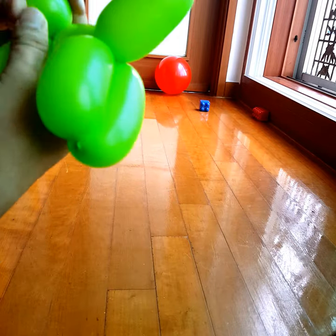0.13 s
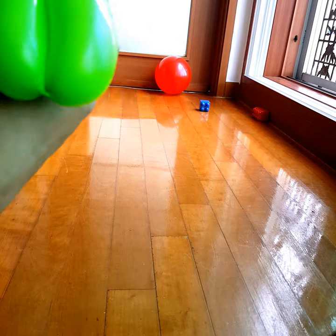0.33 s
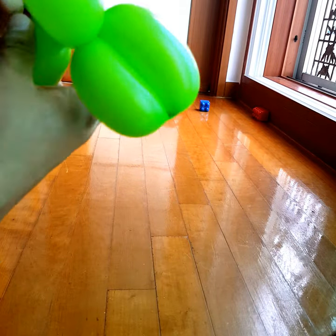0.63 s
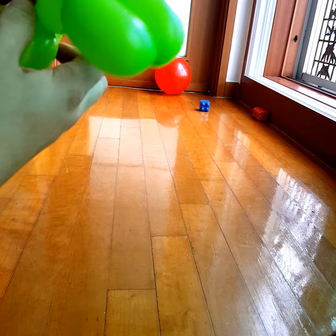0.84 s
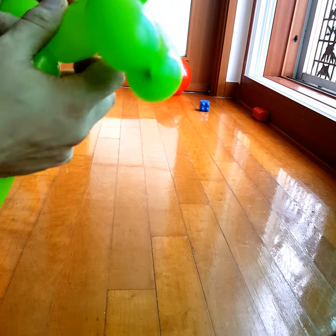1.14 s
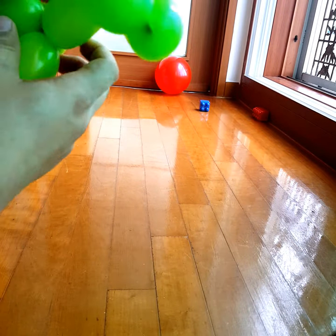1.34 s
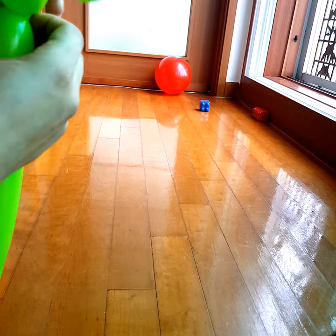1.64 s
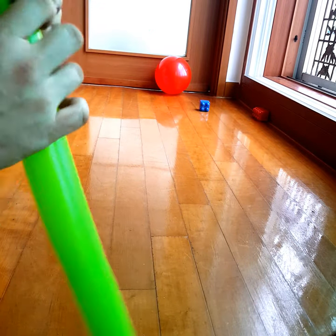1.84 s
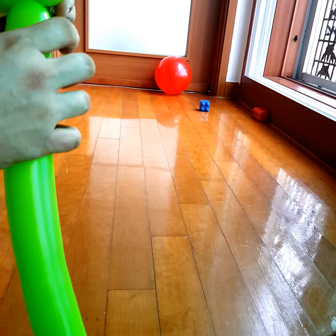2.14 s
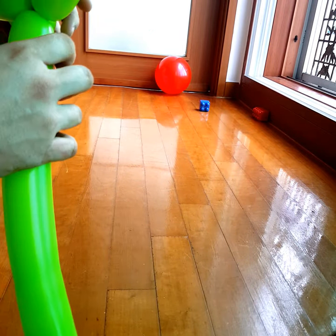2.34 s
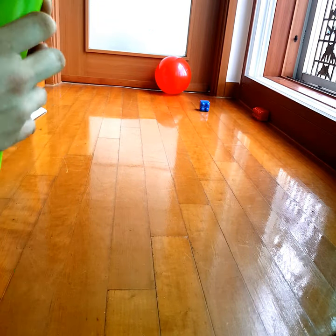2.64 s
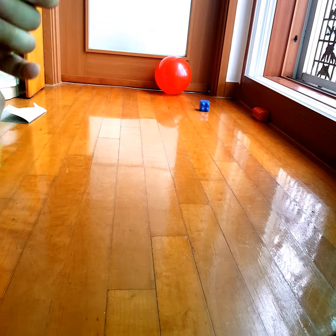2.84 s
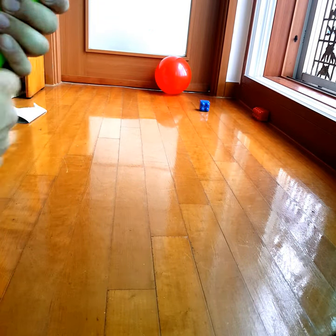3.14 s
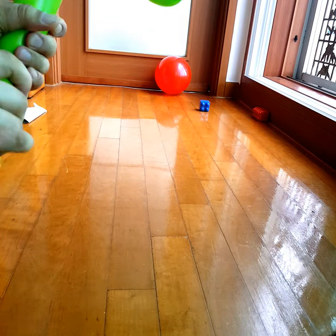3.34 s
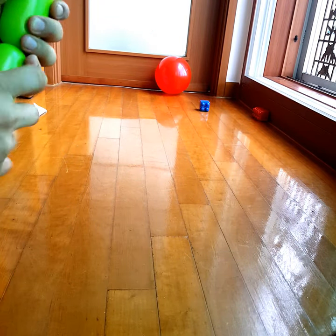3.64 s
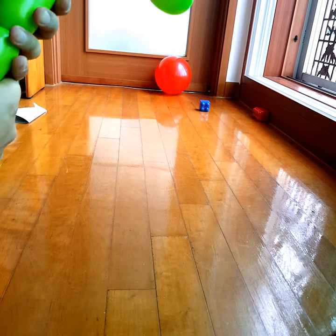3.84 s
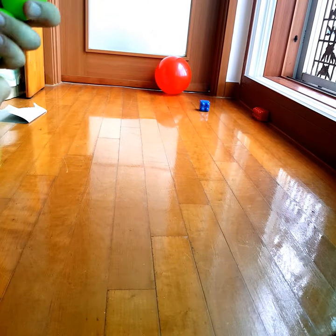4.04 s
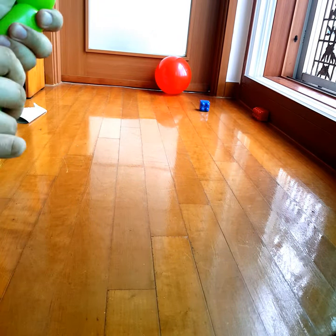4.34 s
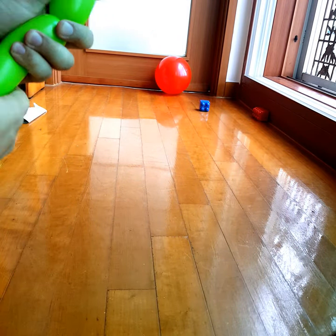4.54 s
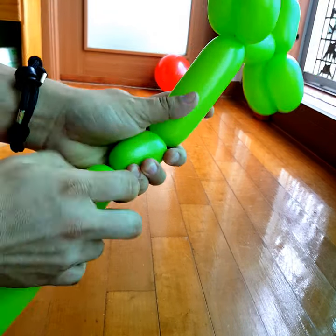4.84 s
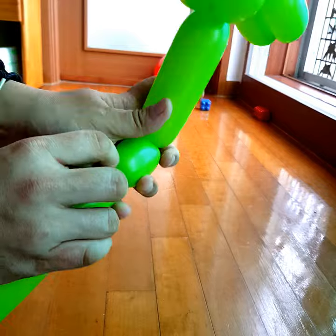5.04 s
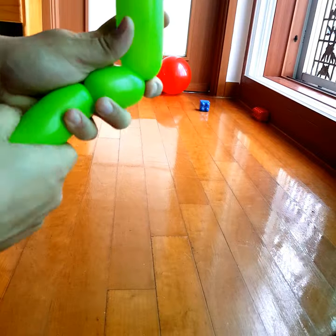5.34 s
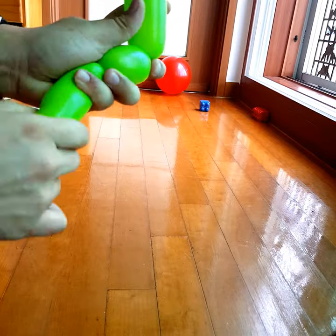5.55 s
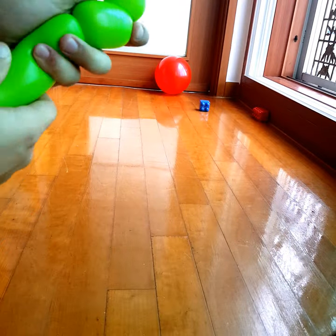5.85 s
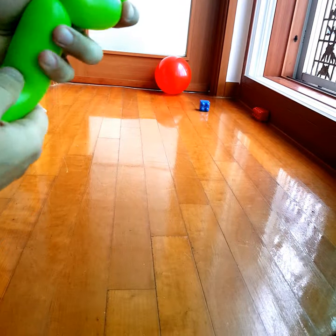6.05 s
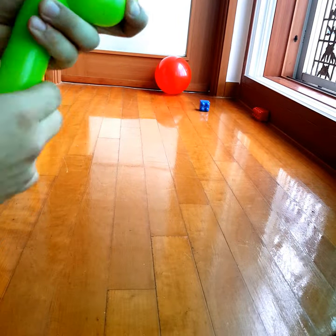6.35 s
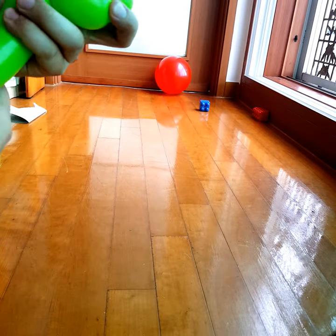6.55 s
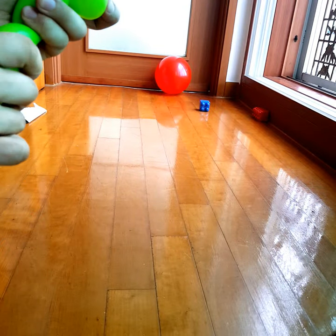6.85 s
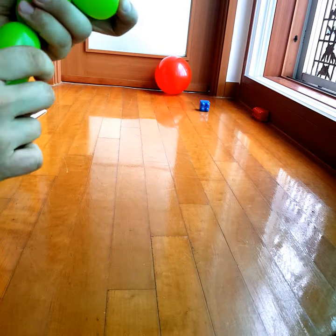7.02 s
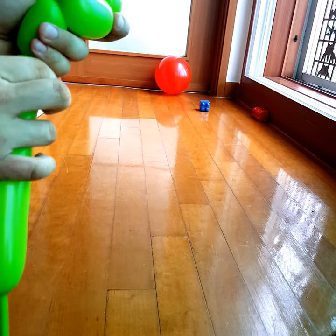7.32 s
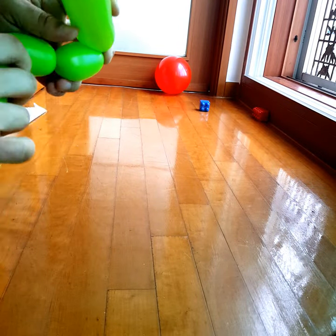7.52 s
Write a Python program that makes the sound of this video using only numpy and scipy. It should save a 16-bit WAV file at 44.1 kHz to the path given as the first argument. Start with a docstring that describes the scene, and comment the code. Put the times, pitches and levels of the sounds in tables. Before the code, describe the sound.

Close, bright rubbing of tight balloon skin: ragged creaks, very brief gliding squeaks from low honks to thin chirps, and crisp snaps as the latex slips free. Fine fingertip crackle runs beneath and fades when the hands rest. Activity comes in uneven bursts with short gaps, busiest in the second half. Small lively indoor room, quiet steady room noise, stereo microphone nearby.

```python
"""A long latex balloon creaks, squeaks and snaps as two hands twist it, close to two microphones.
Its skin sticks and slips: ragged rows of tiny slips creak, even rows squeak and glide, and short
noisy bursts snap as the skin lets go. One set of resonances, for the taut skin and the air inside,
colors the creaks, rasps, snaps and fingertip crackle; the squeaks' clean tones bypass it. A few low
bumps, the short ring of a small room with a wooden floor, and steady room noise complete the scene."""
import sys
import numpy as np
from scipy import signal
from scipy.fft import rfft, irfft, next_fast_len
from scipy.io import wavfile

SR = 44100
rng = np.random.default_rng(int(sys.argv[2]) if len(sys.argv) > 2 else 0)


def store_pcm(level_fs):
    """Save levels as 16-bit WAV."""
    pcm = np.round(np.clip(level_fs, -1, 1) * 32767).astype(np.int16)
    wavfile.write(sys.argv[1], SR, np.atleast_2d(pcm).T)


N = 338688  # length of the scene in samples

# Creaks, skin dragging under the fingers: (t/s, length/s, level of the middle band level/dB,
# bass against that level/dB, ring of the rubbed patch f/Hz)
CREAK_STROKES = [(0, 0.014, -31, -20, 3040), (0.086, 0.023, -29.5, -3.5, 4100),
                 (0.187, 0.023, -32, -14, 1650), (0.286, 0.04, -31.5, -31, 4700),
                 (0.37, 0.055, -33.5, -32, 3490), (0.578, 0.023, -34.5, -9.5, 2520),
                 (0.891, 0.051, -38.5, -6.5, 3200), (0.965, 0.046, -35, -17, 4620),
                 (1.083, 0.061, -26, -25, 3600), (1.754, 0.052, -23.5, -19, 3200),
                 (1.997, 0.042, -29, -18, 3100), (2.026, 0.04, -23.5, -12, 3270),
                 (2.15, 0.025, -40, 1.5, 1550), (2.623, 0.092, -44, -3, 1710),
                 (2.737, 0.034, -33.5, -6.5, 5140), (2.795, 0.059, -30.5, -14.5, 6700),
                 (2.874, 0.051, -30.5, -11, 6650), (2.913, 0.022, -23, -24, 4200),
                 (2.948, 0.027, -22.5, -27, 2730), (2.972, 0.023, -33, -25, 2900),
                 (3.051, 0.08, -29.5, -24, 3900), (3.123, 0.028, -20.5, -15.5, 2600),
                 (3.155, 0.063, -27.5, -19, 2830), (3.249, 0.016, -30.5, -13.5, 4370),
                 (3.335, 0.093, -28, -29, 4300), (3.483, 0.024, -31, -7.5, 2120),
                 (3.577, 0.038, -27.5, -11, 3300), (3.973, 0.041, -34, -14, 6600),
                 (4.024, 0.028, -33.5, -12, 7000), (4.064, 0.077, -26.5, -17, 4700),
                 (4.169, 0.031, -17, -10.5, 7300), (4.286, 0.025, -29.5, -35, 3670),
                 (4.322, 0.039, -30.5, -22, 5600), (4.492, 0.029, -27, -25, 4070),
                 (4.54, 0.054, -30, -14, 1680), (4.6, 0.071, -44, 2.5, 1640),
                 (4.868, 0.052, -28, -11.5, 3700), (4.978, 0.057, -32.5, -6.5, 1590),
                 (5.079, 0.029, -20.5, -15, 3430), (5.315, 0.024, -20.5, -12, 3660),
                 (5.41, 0.022, -30, -14, 2300), (5.475, 0.025, -33.5, -14, 2770),
                 (5.655, 0.021, -30, -21, 3530), (5.733, 0.043, -27.5, -9.5, 1420),
                 (6.043, 0.029, -17.5, -15, 7000), (6.168, 0.032, -30, -16, 1770),
                 (6.209, 0.058, -27, -15.5, 3270), (6.328, 0.092, -28.5, -15.5, 2630),
                 (6.453, 0.053, -21, -15.5, 3840), (6.555, 0.034, -35, -16, 3570),
                 (6.612, 0.037, -21.5, -27, 3320), (6.68, 0.02, -25.5, -12, 1590),
                 (6.828, 0.023, -34, -15, 3880), (6.857, 0.083, -35.5, -12, 3930),
                 (6.922, 0.087, -24.5, -18, 2880), (7.042, 0.028, -32, -10, 3070),
                 (7.164, 0.049, -25, -12.5, 3170), (7.266, 0.048, -40.5, -6.5, 1420),
                 (7.338, 0.071, -28.5, -17, 1350), (7.513, 0.0225, -23, -16.5, 6850),
                 (7.532, 0.026, -19.5, -15, 3420)]
CREAK_JITTER, FIRM_DB, JITTER_PER_DB = 0.3, -22, 0.03  # lighter creaks stumble more
CREST, CREST_PER_S = 0.26, 0.8  # share of a creak spent swelling: long ones build up more slowly
CREAK_SAG_OCTAVES = 0.25  # the rubbed patch slackens, so its ring sinks through a creak


def creak(row, chance):
    """A ragged rub: its attack follows its length, its unevenness follows its force, its ring sinks."""
    s, length, level_db, bass_db, ring_hz = row
    jitter = np.clip(CREAK_JITTER + JITTER_PER_DB * (FIRM_DB - level_db), 0.24, 0.7)
    sag = CREAK_SAG_OCTAVES * np.linspace(1 / 2, -1 / 2, int(length * SR))
    patch_hz = ring_hz * 2 ** sag
    crest = CREST + CREST_PER_S * length
    stroke = (length, crest, patch_hz, jitter, level_db, bass_db, treble_at(s))
    return rub(stroke, chance, skin_ring(chance[0, -1]))


# Squeaks, where the slipping locks to a pitch: (t/s, length/s, pitch in mid-glide f/Hz, glide/octaves,
# rasp, middle band level/dB, clean tone before its overtones and TONE_TRIM_DB level/dB)
SQUEAK_STROKES = [(0.025, 0.027, 1543, -0.24, -27, -36), (0.056, 0.026, 961, -0.33, -21, -64),
                  (0.214, 0.03, 700, -0.072, -31, -35), (0.428, 0.05, 608, -0.31, -62, -43),
                  (1.271, 0.0079, 657, -0.26, -49, -40), (1.597, 0.028, 2230, 0, -69, -50),
                  (1.876, 0.014, 1315, -0.32, -29.5, -29.5), (1.894, 0.044, 735, -0.21, -29, -30.5),
                  (3.314, 0.03, 1566, 0.024, -25.5, -64), (3.321, 0.012, 4690, -0.16, -23.5, -27),
                  (3.425, 0.025, 1632, 0.12, -30.5, -25.5), (3.55, 0.031, 1192, 0.11, -35, -34.5),
                  (3.665, 0.035, 2456, -0.012, -27.5, -49), (3.69, 0.043, 1619, 0.014, -20, -41),
                  (3.807, 0.049, 3690, 0.046, -31.5, -42), (3.864, 0.024, 3870, -0.14, -26.5, -46),
                  (4.096, 0.017, 4690, 0.3, -41, -16), (4.146, 0.037, 2410, -0.16, -17.5, -45),
                  (4.571, 0.062, 1640, -0.15, -54, -39), (4.633, 0.048, 634, -0.2, -51, -43),
                  (4.721, 0.039, 2610, 0.14, -23, -28), (4.785, 0.016, 5100, 0.028, -25, -31),
                  (4.924, 0.034, 2164, -0.22, -23, -28), (5.041, 0.033, 1445, -0.19, -22.5, -45),
                  (5.133, 0.024, 1555, -0.14, -15, -29), (5.151, 0.028, 3910, 0.108, -18, -6.5),
                  (5.166, 0.029, 797, -0.19, -19, -27.5), (5.188, 0.0327, 684, -0.127, -27.5, -26.5),
                  (5.237, 0.031, 700, -0.12, -33, -40), (5.284, 0.0155, 2690, 0.059, -21, -32),
                  (5.299, 0.0165, 2292, 0.14, -18.5, -19), (5.321, 0.0087, 1055, 0.45, -21, -23.5),
                  (5.557, 0.053, 2593, -0.23, -23, -48), (5.693, 0.011, 2073, -0.22, -19, -19.5),
                  (5.892, 0.034, 1150, -0.67, -28, -46), (5.922, 0.044, 637.3, -0.028, -27.5, -31.5),
                  (6.228, 0.057, 3290, 0.063, -36, -23.5), (6.369, 0.057, 2550, -0.11, -36, -31),
                  (6.463, 0.048, 645, -0.16, -43, -32.5), (6.516, 0.035, 782, -0.21, -47, -39.5),
                  (6.729, 0.016, 727, -0.28, -27.5, -32.5), (7.368, 0.03, 1095, -0.16, -25.5, -26),
                  (7.394, 0.027, 573, -0.13, -18.5, -40), (7.555, 0.025, 736, -0.34, -22, -34),
                  (7.558, 0.019, 7120, 0.04, -41, -23)]
SQUEAK_JITTER, SQUEAK_CREST = 0.1333, 0.52
LOW_HZ, LOW_BASS_DB, BASS_DB_PER_OCTAVE = 700, -12.5, -5.5  # the higher a squeak, the less bass it has
OVERTONE_DB, OVERTONE_PER_TREBLE = -0.5, 3.4  # second harmonic, which follows the treble


def squeak(row, chance):
    """An even rub (the rasp) and a clean tone glide together; higher squeaks have less bass."""
    s, length, hz, glide, rasp_db, tone_db = row
    bass_db = LOW_BASS_DB + BASS_DB_PER_OCTAVE * np.log2(hz / LOW_HZ)
    treble_db = treble_at(s)
    pitch = hz * 2 ** (glide * np.linspace(-1 / 2, 1 / 2, int(length * SR)))
    stroke = (length, SQUEAK_CREST, pitch, SQUEAK_JITTER, rasp_db, bass_db, treble_db)
    rasp = rub(stroke, chance, skin_ring(chance[0, -1]), wander=0.1)
    second_db = OVERTONE_DB + OVERTONE_PER_TREBLE * treble_db
    tone = squeal((length, pitch[0], pitch[-1], tone_db, second_db), chance)
    return rasp, tone


WAVER_PER_S = 0.77  # pitch waver per second of length: long squeaks hold their pitch less firmly
TONE_CREST, TONE_EASE = 0.55, 0.24  # a tone builds up while the slipping locks


def squeal(stroke, chance, waver_per_s=600, flutter_db=3, overtone_fall_db=8):
    """Regular slipping makes a gliding, fluttering tone with a few overtones."""
    length, first_hz, last_hz, level_db, second_db = stroke
    t = np.arange(int(length * SR)) / SR
    waver = 1 + WAVER_PER_S * length * drift(t, chance[0], waver_per_s)
    hz = np.linspace(first_hz, last_hz, len(t)) * waver
    phase = 2 * np.pi * np.cumsum(hz) / SR
    wave = np.sin(phase)
    for k in range(2, 10):
        if k * hz.max() < SR / 2:  # only overtones that digital sound can hold
            # offset of 2.5: the second harmonic sits half a step above second_db
            wave = wave + gain_of(second_db - overtone_fall_db * (k - 2.5)) * np.sin(k * phase)
    flutter = gain_of(flutter_db * drift(t, chance[1], waver_per_s))
    force = evened(grip(t, TONE_CREST, ease=TONE_EASE) * flutter)
    return gain_of(level_db) * np.sqrt(2) * force * wave


SLIP_SPREAD = 1.45  # how unequal the slips are in size, more so in uneven strokes
SLIP_TAPS = 10  # samples used to place one slip


def rub(stroke, chance, ring, wander=0.15, wander_per_s=90, scatter=1.2, lurch_db=1.5, lurch_per_s=260,
        patch_db=6, patch_width=480, partner_db=-4, slips_per_s=1050):
    """Slips, uneven in spacing and size, strike the skin through the ringing patch under the finger."""
    length, crest, patch_hz, jitter, level_db, bass_db, treble_db = stroke
    t = np.arange(int(length * SR)) / SR
    hz = patch_hz * np.exp(wander * drift(t, chance[0], wander_per_s))  # patch stretches and slackens
    # a smooth stroke slips every cycle, a ragged one at its own pace
    ragged = jitter > 0.23
    turns = slips_per_s * t if ragged else np.cumsum(hz) / SR

    # waits between slips, in cycles, are random around one
    spread = scatter * jitter
    due = np.cumsum(np.exp(spread * chance[1] - spread ** 2 / 2))
    due = due - due[0]
    at = np.interp(due[due < turns[-1]], turns, np.arange(len(t)))
    force = grip(t, crest) * gain_of(lurch_db * drift(t, chance[2], lurch_per_s))
    unequal = np.exp(SLIP_SPREAD * jitter * np.clip(chance[3, :len(at)], -2, 2))
    sizes = force[at.astype(int)] * unequal

    # each slip may fall between two samples, so a short smooth pulse draws it
    near = at.astype(int)[:, None] + np.arange(SLIP_TAPS)
    offset = near - at[:, None] - SLIP_TAPS / 2
    pulses = sizes[:, None] * np.sinc(offset) * np.cos(np.pi * offset / (SLIP_TAPS + 2)) ** 2
    slips = np.bincount(near.ravel(), pulses.ravel(), len(t) + 10 * SLIP_TAPS)

    # the patch rings in two modes, an octave apart, that glide together
    mode_hz = np.pad(hz, (0, len(slips) - len(t)), "edge")
    octave_hz = mode_hz * (1 / 2 if ragged else 2)
    main_mode = resonate(slips, mode_hz, patch_width)
    partner = gain_of(partner_db) * resonate(slips, octave_hz, patch_width)
    slips = slips + gain_of(patch_db) * (main_mode + partner)

    # a broad, soft contact brings out the bass; a tight, dry one the treble
    parts = bands(signal.fftconvolve(slips, ring))
    band_gains = gain_of(level_db + np.array([bass_db, 0, treble_db]))
    return band_gains * np.sqrt(len(t)) / np.linalg.norm(parts, axis=1) @ parts


# Treble of the creaks and rasps, which also steers the squeaks' overtones:
# (t/s, treble against the middle band level/dB)
STROKE_TREBLE = [(0.05, -6), (0.35, -1.5), (1.0, -3), (2.7, -5.5), (3.15, -6.5), (3.75, 0), (4.15, -2),
                 (4.75, -10.5), (5.3, -7), (5.6, -15), (6.0, -3), (6.65, -9), (6.95, -8), (7.18, -6),
                 (7.55, -9)]


def treble_at(s):
    """Reads how bright the rubbing is at time s."""
    return np.interp(s, *np.transpose(STROKE_TREBLE))


def grip(t, crest, rise_s=0.0024, ease=0.085):
    """A stroke swells to its crest, holds and lets go; a later crest starts from less force."""
    crest = np.clip(crest, 0.02, 0.98)
    swell = np.interp(t / t[-1], [0, crest, 1], [1 - crest, 1, 1])
    ramp_s = rise_s + ease * crest * (1 - crest) * t[-1]  # a crest midway gives the longest fades
    return swell * np.clip(np.minimum(t, t[-1] - t) / ramp_s, 0, 1)


def resonate(x, hz, width):
    """A moving resonance: shifts the curve hz down to zero, smooths, and shifts back."""
    turn = np.exp(2j * np.pi * np.cumsum(hz) / SR)
    r = np.exp(-np.pi * width / SR)  # a narrow width (Hz) rings longer
    return 2 * (turn * signal.lfilter([1 - r], [1, -r], x / turn)).real


# Color of the taut skin and the air inside, before stretching: (f/Hz, level/dB)
SKIN_COLOR = [(60, -50.5), (330, -17.5), (520, -6.5), (660, -2.5), (930, -6), (2500, 4.5), (3200, 9.5),
              (3900, 13), (4700, 5.5), (6000, 1), (7100, 4.5), (8200, -4.5), (11000, 0), (13300, -10)]
# Narrow ring of the skin, added on top of that color: (f/Hz, width/Hz, level against the color/dB)
SKIN_RINGS = [(9240, 390, -12.5)]
STRETCH_OCTAVES = 0.09  # the skin's tension, and with it its color, differs from stroke to stroke


def skin_ring(stretch=0, size=2048):
    """How the balloon answers one slip; stretching shifts all its resonances."""
    hz = np.fft.rfftfreq(size, 1 / SR) / 2 ** (STRETCH_OCTAVES * stretch)
    peaks = sum(gain_of(db) / (1 + (2 * (hz - f) / w) ** 2) for f, w, db in SKIN_RINGS)
    gain = gain_of(read(SKIN_COLOR, hz)) * (1 + peaks)
    # minimum phase: the answer starts at once, never before the slip
    log_gain = np.log(np.r_[gain, gain[-2:0:-1]])
    return np.fft.ifft(np.exp(np.conj(signal.hilbert(log_gain)))).real[:size // 2]


# Snaps of the skin letting go: (t/s, peak before snap_db and echoes level/dB,
# bass before bass_lift_db/dB, decay of the chatter/ms)
SNAP_HITS = [(0.351, -5.5, -17, 2.5), (0.3547, -5.5, -13, 3.5), (0.3605, -1, -22, 1.8),
             (0.46, -25, 20, 2.7), (0.4984, -6, -21, 4.2), (0.626, -18, -14.5, 4), (0.66, -17, -13, 4),
             (0.858, -13, -15.5, 5), (1.044, -19.5, -8, 2.7), (1.065, -3.5, -17.5, 3.7),
             (1.092, -8, -28, 1.3), (1.098, -7, -20, 2.4), (1.1135, -2, -28, 3.2), (1.302, -26, 16, 3),
             (1.354, -16, -5, 6.5), (1.4325, -14, -21, 4.9), (1.481, -26, -26, 3), (1.73, -12.5, -20, 3),
             (1.7715, -4.5, -30, 4), (1.778, -5, -20.5, 3.2), (1.842, -12.5, -10, 2),
             (2.026, 0.5, -30, 2.1), (2.092, -9, -26, 2.6), (2.272, -24.5, -11, 4.5),
             (2.32, -17.5, -4.5, 3.7), (2.36, -21, -6.5, 3.7), (2.452, -22.5, -34, 2.7),
             (2.743, -14.5, -21, 4.8), (2.812, -7, -45, 5), (2.88, -17, -29, 2), (2.914, -6, -42, 5.6),
             (2.93, 0, -36, 2.1), (3.053, -7.5, -49, 5.2), (3.1255, -10, -26, 1.5), (3.139, 0, -20, 1.5),
             (4.032, -13, -25, 3.5), (4.289, -21, -42, 3.5), (4.331, -7, -22, 4.3), (4.691, -17, -8.5, 4),
             (4.8985, -2.5, -41, 2.2), (5.139, -2, -25, 3), (5.3025, -4.5, -34, 2.5),
             (5.3215, -2, -17.5, 2.5), (5.3305, -8, -18, 2), (5.339, -3, -17, 1.5),
             (5.3455, -5.5, -28, 1.1), (5.694, -6.5, -11, 3), (5.7285, -2, -18, 1.5),
             (5.7825, -11.5, -15, 1.7), (5.7895, -13, -10.5, 1), (5.945, -4, -24, 1.8),
             (6.048, 2.5, -19.5, 1.7), (6.456, -2.5, -31, 2.9), (6.496, -0.5, -27, 4.7),
             (6.615, -3, -22, 2.7), (6.624, -5.5, -21.5, 2.9), (6.6305, -6, -23, 1.7),
             (6.677, -5.5, -25, 2.5), (6.689, -11, -11, 2.4), (6.7385, -9.5, -19, 2.8),
             (6.826, -12.5, -33, 3), (7.366, -6.5, -16, 3), (7.3955, -4, -8, 1.7), (7.4775, -9, -16, 4.3),
             (7.4985, -11, -16, 4.3)]


def snap(row, chance, bass_lift_db=19, snap_db=-1):
    """A short burst of noisy chatter with a small click in it; the air in the tube adds a low pop."""
    _, peak_db, bass_db, chatter_ms = row
    ms = np.arange(len(chance)) * 1000 / SR
    push = chance * np.exp(-ms / chatter_ms)
    push[20] += 2  # the small click
    parts = bands(signal.fftconvolve(push, skin_ring(chance[-1])))
    sound = gain_of([bass_db + bass_lift_db, 0, 0]) @ parts
    return gain_of(peak_db + snap_db) * sound / abs(sound).max()


# Fingertip crackle, which nearly vanishes when the hands rest: (t/s, level/dB)
FINGER_LEVEL = [(0, -42.5), (0.62, -40), (0.8, -62), (1.05, -38), (1.3, -60), (1.68, -59), (1.85, -33.5),
                (2.25, -52), (2.62, -68), (2.9, -36), (4.2, -48), (4.44, -71), (4.65, -45.5), (5.2, -45.5),
                (5.85, -37), (6.95, -54), (7.12, -65), (7.4, -63)]


def fingers(ring, ticks_per_s=500, spread_db=6, largest=2.94, count=8):
    """Fine random ticks of fingertips shifting on the skin; each finger is heard by its own path."""
    ticks = rng.exponential(1, N)
    sizes = gain_of(spread_db * np.minimum(ticks, largest)) * (rng.random(N) < ticks_per_s / SR)
    finger = rng.integers(0, count, N)
    crackle = np.zeros((2, N))
    for k, path in enumerate(rng.random(size=(count, 36))):
        own_ticks = (sizes * (finger == k))[None]
        crackle += signal.oaconvolve(own_ticks, nearby(ring, path), axes=1)[:, :N]
    level_db = np.interp(np.arange(N) / SR, *np.transpose(FINGER_LEVEL))
    return gain_of(level_db) * evened(crackle)


# Low groans and a soft bump as the hands change grip: (t/s, length/s, pitch f/Hz, level/dB)
GRIP_BUMPS = [(2.616, 0.048, 279, -54), (2.899, 0.25, 229, -54), (3.041, 0.051, 125, -48),
              (7.58, 0.043, 246, -52)]


def bump(row, chance):
    """A dull, slightly wavering low tone that swells and fades, alike on both sides."""
    _, length, hz, level_db = row
    t = np.arange(int(length * SR)) / SR
    waver = 1 + 0.13 * drift(t, chance, 170)
    phase = 2 * np.pi * np.cumsum(hz * waver) / SR
    return gain_of(level_db) * evened(np.sin(phase) * np.hanning(len(t))) * np.ones((2, 1))


MIC_LAG = 6  # samples by which the left microphone leads, roughly


def nearby(x, chance, near_db=-2, fade_s=0.003, size=500):
    """Direct sound from the left, plus its own quick echoes off hands and floor; keeps the energy."""
    when, side, sign = chance.reshape(3, -1)
    at = (20 + when ** 2 * (size - 2 * 20)).astype(int)
    heights = np.sign(sign - 0.5) * np.exp(-at / SR / fade_s)
    taps = echoes(at, gain_of(near_db) * heights / np.linalg.norm(heights), side, size)
    # the direct sound reaches the left first, then the right
    taps[0, 0] = taps[1, MIC_LAG + round(2 * (side[0] - side[1]) - 0.5)] = 1
    heard = signal.fftconvolve(x[None], taps, axes=1)
    return heard * np.sqrt(2) * np.linalg.norm(x) / np.linalg.norm(heard)


def echoes(at, heights, sides, size):
    """Reflections at the two microphones; each arrives from its own side (0-1)."""
    taps = np.zeros((2, size))
    lag = np.round((2 * sides - 1) * (MIC_LAG + 2)).astype(int)
    np.add.at(taps[0], at, heights)
    np.add.at(taps[1], at + lag, heights)
    return taps


def room(x, wet_db=-8, turn_per_s=23, count=3):
    """The flexing balloon radiates in changing directions, so it feeds several echo paths in turn."""
    angle = np.pi * (turn_per_s * np.arange(N) / SR + np.arange(count)[:, None] / count)
    shares = np.sqrt(2 / count) * abs(np.cos(angle))
    wet = sum(signal.oaconvolve(x * share, tail(), axes=1)[:, :N] for share in shares)
    return gain_of(wet_db) * wet


# How long the room takes to fade by 60 dB: (f/Hz, time/s)
ROOM_FADE = [(250, 0.25), (700, 0.25), (4000, 0.21), (15000, 0.22)]


def tail(first_s=0.006, size=16000, count=2400):
    """Random wall echoes that die away at a rate set by pitch, scaled to a fixed energy."""
    when, side, sign = rng.random((3, count))
    start = first_s * SR
    at = (start + when * (size - start - 20)).astype(int)
    taps = echoes(at, np.sign(sign - 0.5), side, size)
    hz, t, z = signal.stft(taps, SR, nperseg=256)
    fade = gain_of(-60 * t / read(ROOM_FADE, hz)[:, None])
    decayed = signal.istft(z * fade, SR)[1]
    return decayed / np.linalg.norm(decayed[0])


# Color of the still room's noise, before it is scaled to level_db: (f/Hz, level per Hz/dB)
HUSH_COLOR = [(30, -13.5), (120, -17.5), (190, -5.5), (290, -10.5), (520, -3), (850, -1), (2000, -11.5),
              (3500, -12), (5000, -17), (7200, -16), (11000, -13), (16000, -28)]


def hush(alike_hz=1500, level_db=-49.5):
    """Steady room noise, alike at both microphones in the bass and separate in the treble."""
    hz = np.fft.rfftfreq(N, 1 / SR)
    left, other = rfft(rng.standard_normal((2, N)))
    same = np.exp(-(hz / alike_hz) ** 2 / 2)
    pair = np.array([left, same * left + np.sqrt(1 - same ** 2) * other])
    return gain_of(level_db) * evened(irfft(pair * gain_of(read(HUSH_COLOR, hz)), N))


def gain_of(db):
    """Turns decibels into amplitude."""
    return 10 ** (np.asarray(db) / 20)


def evened(x):
    """Scales a sound to an average (rms) strength of one."""
    return x / np.sqrt(np.mean(x ** 2) + 1e-20)


def read(points, hz):
    """Reads a curve between its points, with frequency spaced as the ear hears it (log)."""
    f, value = np.transpose(points)
    return np.interp(np.log(hz + 1), np.log(f), value)


def drift(t, knots, per_s):
    """Slow chance: random knots joined by straight lines."""
    return np.interp(t * per_s, np.arange(len(knots)), knots)


def bands(x, bass_hz=1400, treble_hz=5500):
    """Splits a sound into bass, middle and treble that add up to the whole."""
    size = next_fast_len(len(x))
    hz = np.fft.rfftfreq(size, 1 / SR)
    low, under = (1 / (1 + (hz / edge) ** 10) for edge in (bass_hz, treble_hz))
    return irfft(rfft(x, size) * np.array([low, under - low, 1 - under]), size)[:, :len(x)]


def add(mix, s, sound):
    """Mixes a stereo sound in at time s."""
    part = mix[:, max(round(s * SR), 0):][:, :sound.shape[1]]
    part += sound[:, :part.shape[1]]


def with_chance(table, *shape):
    """Gives each row its own random numbers and its own random echo path."""
    chances = rng.standard_normal(size=(len(table), *shape))
    return zip(table, chances, rng.random(size=(len(table), 36)))


TONE_TRIM_DB = -1  # level of all clean tones
TONE_ROOM_DB = -2.5  # share of the tones that reaches the walls, against the rubbing


def scene():
    """Creaks, squeaks, snaps, crackle and bumps of the balloon, in the room."""
    balloon, tones = np.zeros((2, 2, N))
    for row, chance, path in with_chance(CREAK_STROKES, 4, 500):
        add(balloon, row[0], nearby(creak(row, chance), path))
    for row, chance, path in with_chance(SQUEAK_STROKES, 4, 500):
        rasp, tone = squeak(row, chance)
        add(balloon, row[0], nearby(rasp, path))
        add(tones, row[0], gain_of(TONE_TRIM_DB) * nearby(tone, path, near_db=-9))
    for row, chance, path in with_chance(SNAP_HITS, 400):
        add(balloon, row[0], nearby(snap(row, chance), path, near_db=-4))
    for row, chance in zip(GRIP_BUMPS, rng.standard_normal(size=(len(GRIP_BUMPS), 40))):
        add(balloon, row[0], bump(row, chance))
    balloon = balloon + fingers(skin_ring())
    to_walls = balloon + gain_of(TONE_ROOM_DB) * tones
    return balloon + tones + room(to_walls) + hush()


def record(dry):
    """Two slightly unlike microphones; peaks clip at full scale, then deep bass and top are cut."""
    # right against left (f/Hz, level/dB): stronger near 3 kHz, weaker near 650 Hz
    unlike = [(300, 1.4), (650, -1.5), (1200, 0.0), (3200, 2.5), (4500, 1.0), (9000, -0.5)]
    right_db = read(unlike, np.fft.rfftfreq(N, 1 / SR))
    heard = irfft(rfft(dry) * gain_of(np.outer([-0.5, 0.5], right_db)), N)
    heard = np.clip(heard, -1, 1)
    heard = signal.sosfilt(signal.butter(2, 60, "high", fs=SR, output="sos"), heard)
    top_cut = signal.firwin(511, 15900, window=("kaiser", 9), fs=SR)
    return signal.oaconvolve(heard, top_cut[None], "same")


dry = scene()
out = record(dry)
store_pcm(out)
```